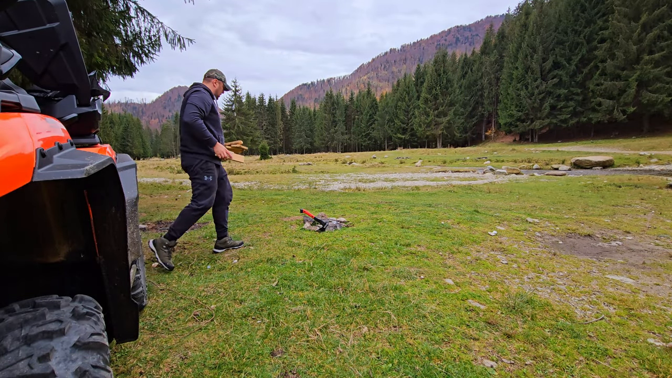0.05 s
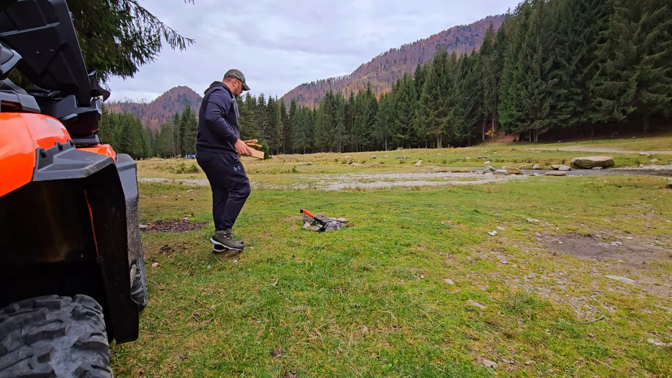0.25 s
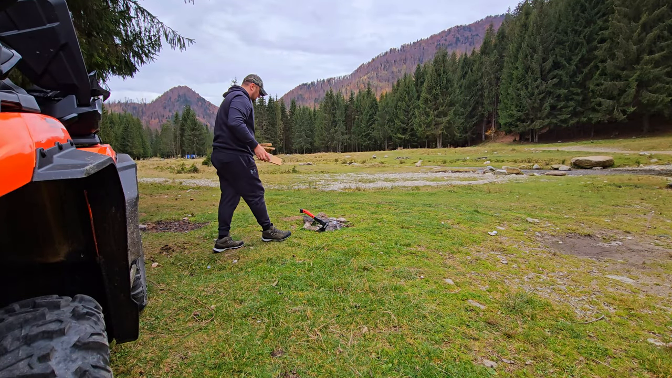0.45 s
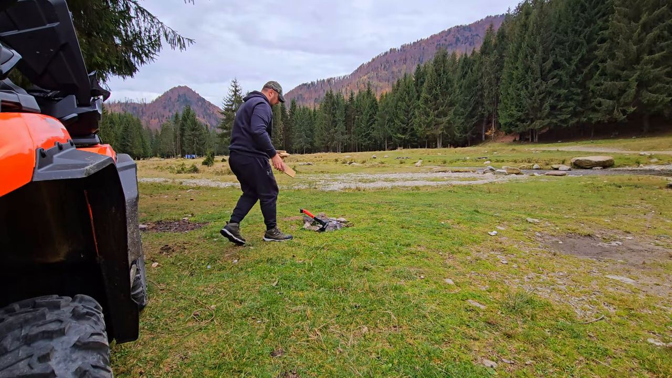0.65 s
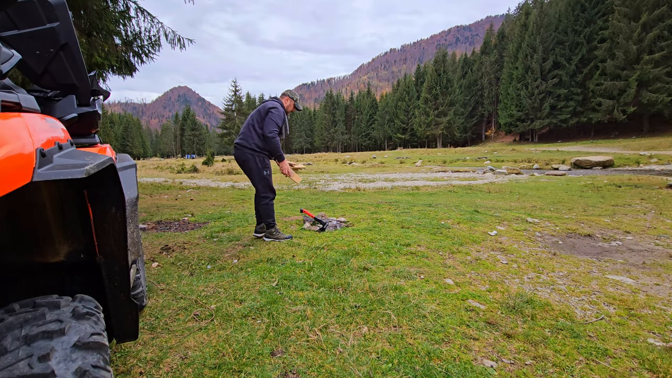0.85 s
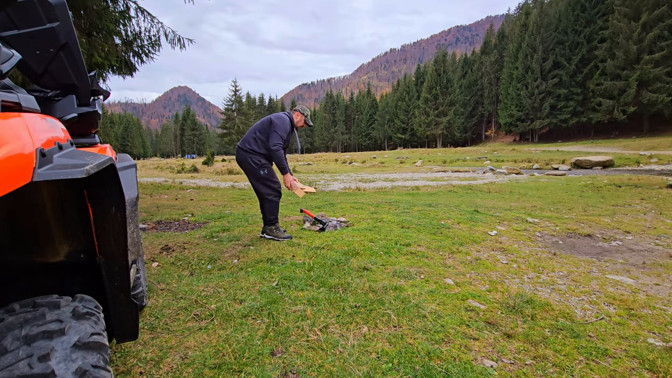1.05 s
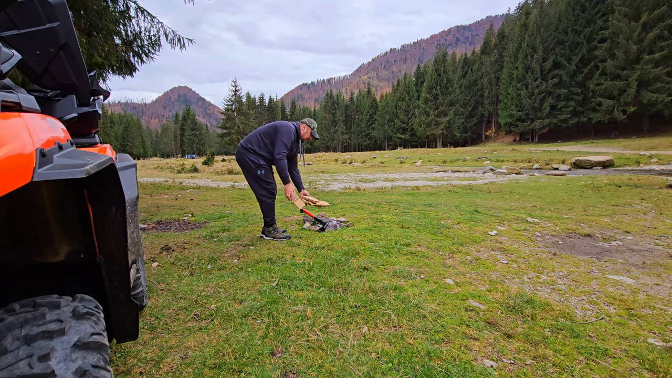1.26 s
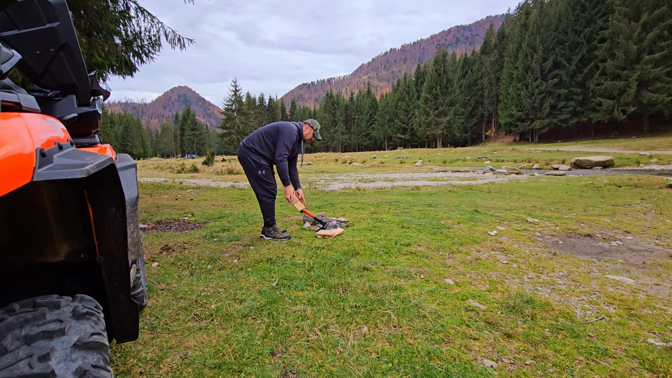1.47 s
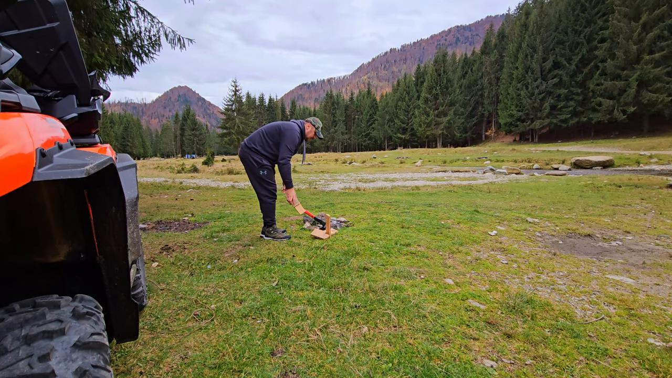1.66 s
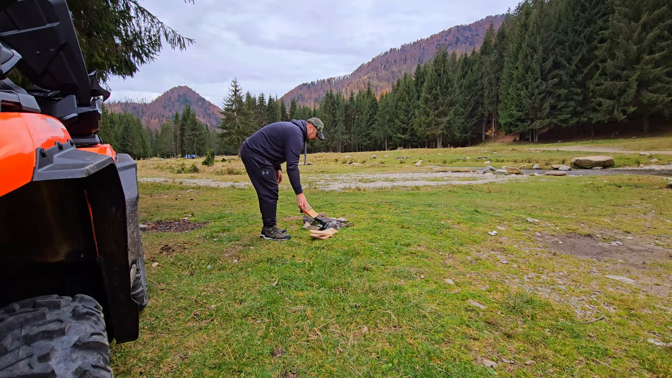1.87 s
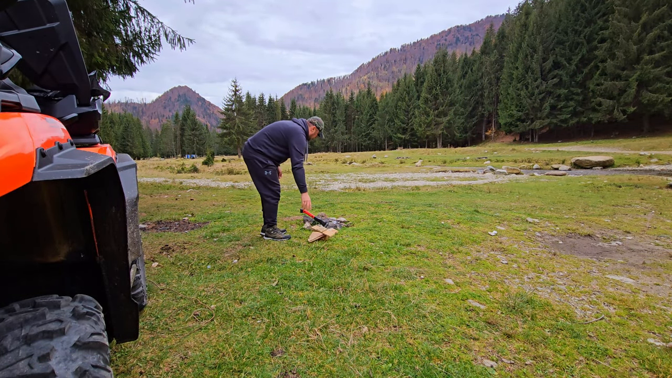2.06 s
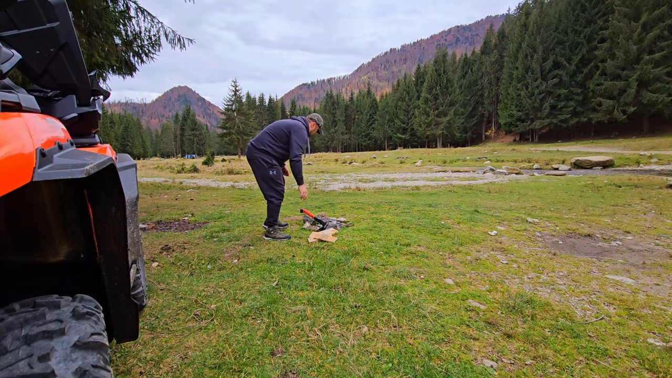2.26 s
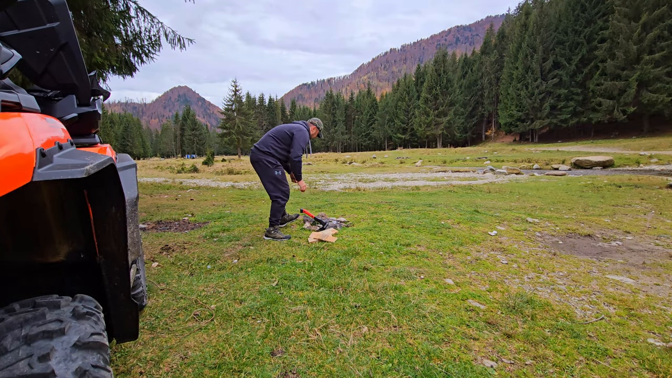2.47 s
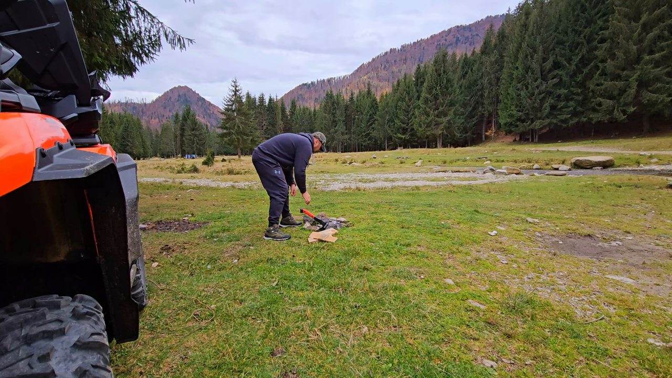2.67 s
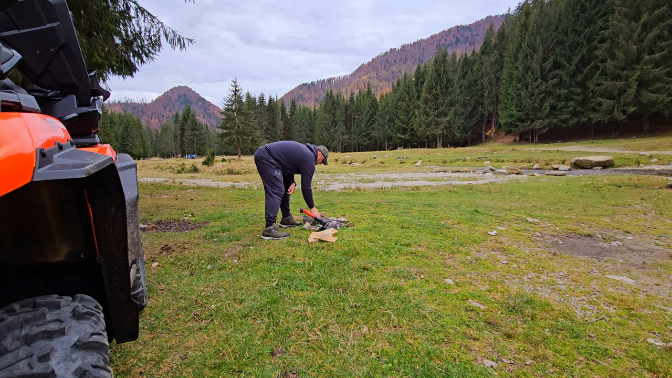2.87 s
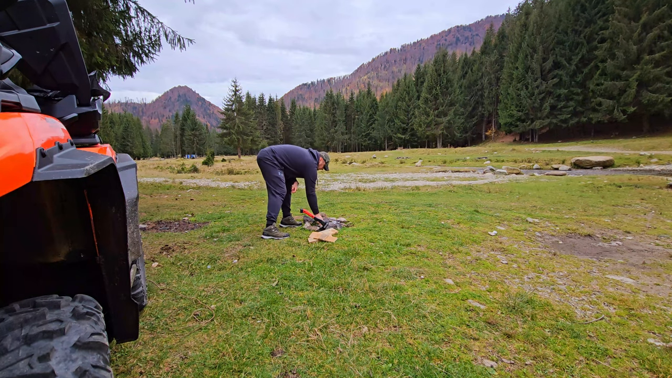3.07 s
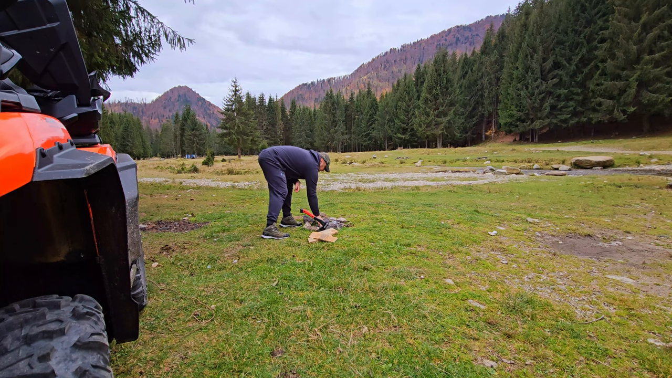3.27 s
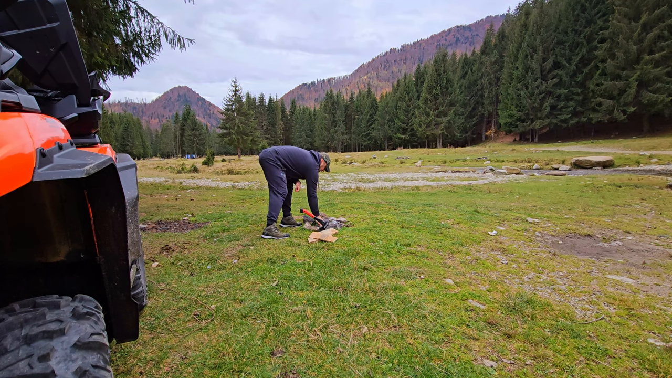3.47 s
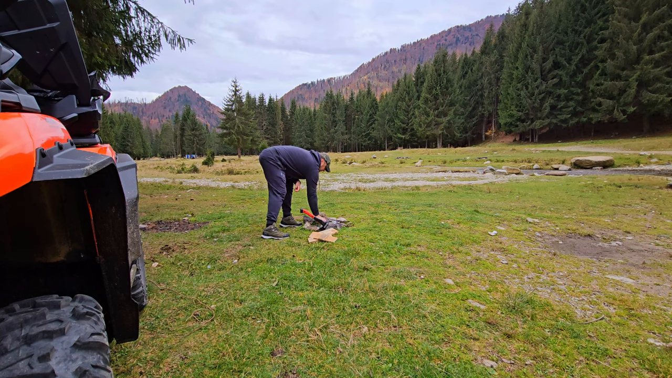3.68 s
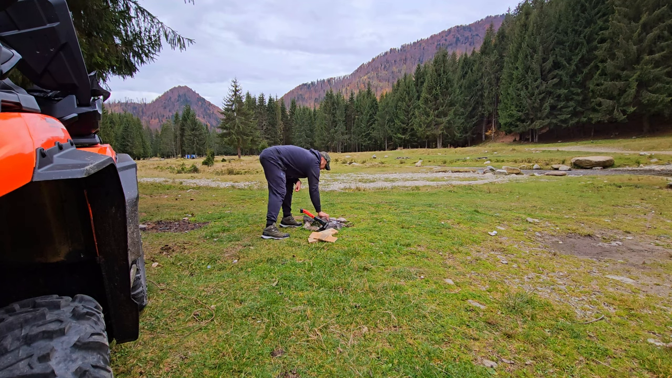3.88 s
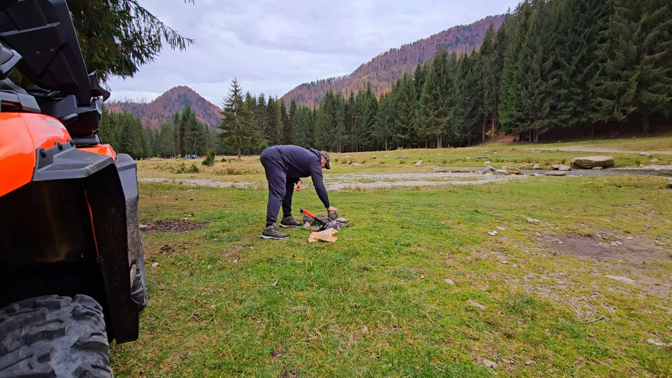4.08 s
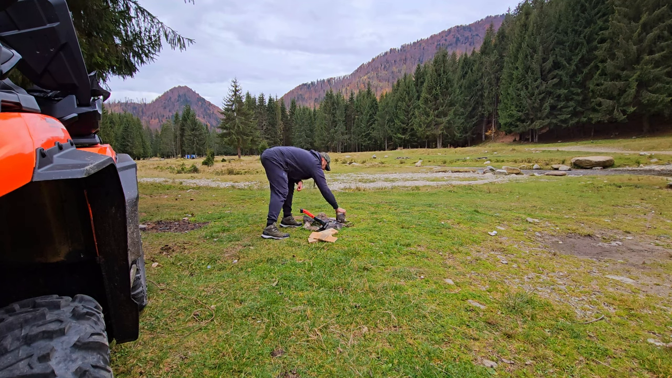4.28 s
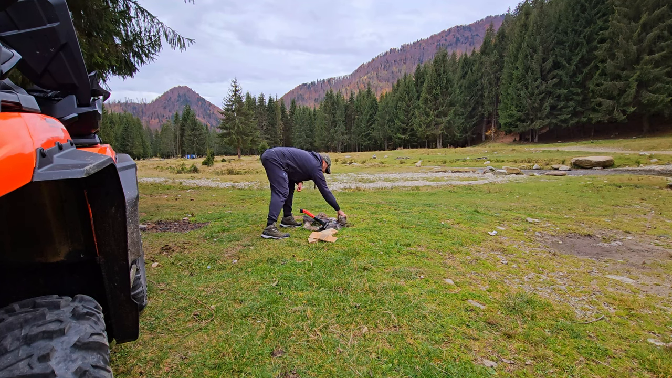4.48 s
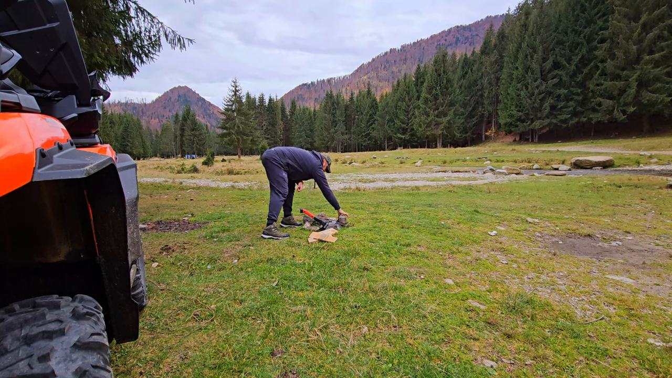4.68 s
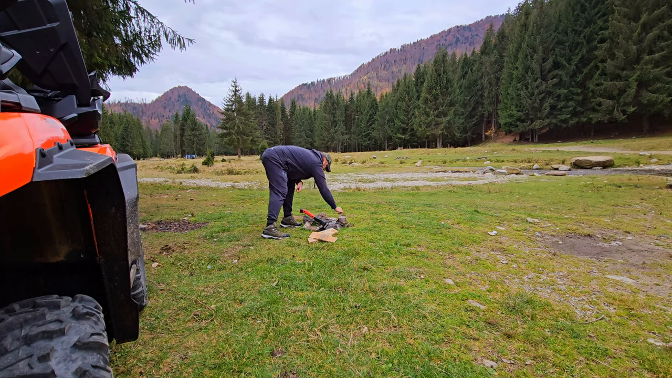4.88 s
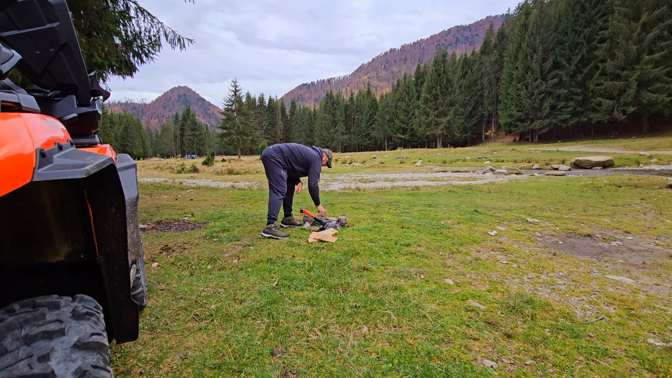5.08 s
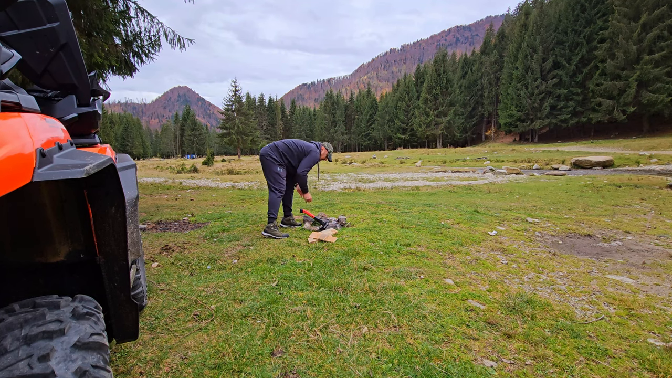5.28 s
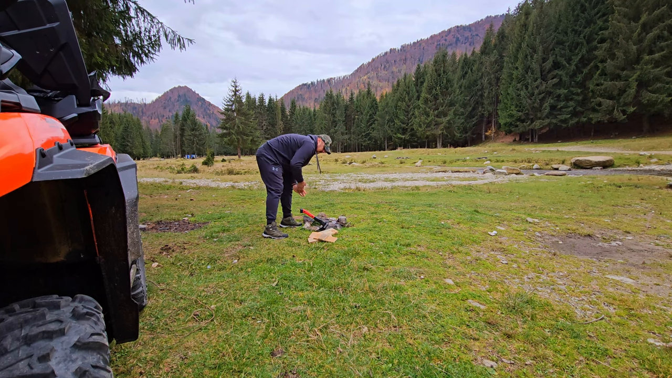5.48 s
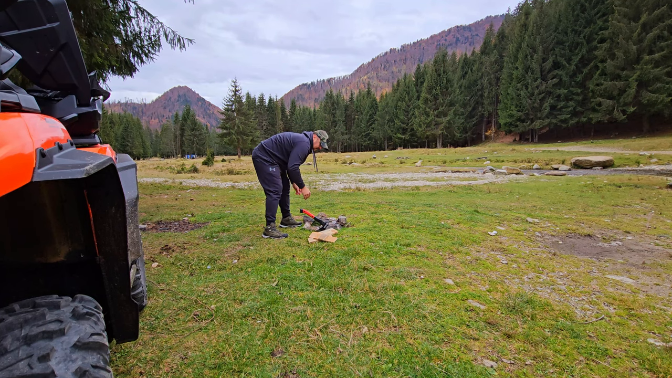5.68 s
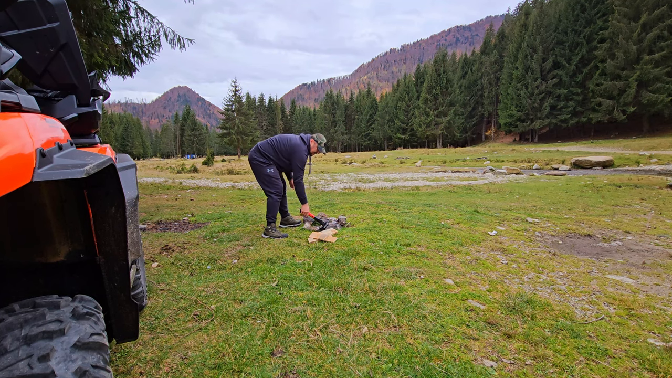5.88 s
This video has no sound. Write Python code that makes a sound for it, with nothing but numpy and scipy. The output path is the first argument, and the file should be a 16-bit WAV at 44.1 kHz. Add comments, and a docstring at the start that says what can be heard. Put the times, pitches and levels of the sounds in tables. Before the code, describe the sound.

Dry wooden clatter as two logs land one after another outdoors, followed by a dull set-down knock, with light mic wind and a faint bird.

```python
"""Two pieces of split firewood drop on a small pile in a meadow: each clatters and settles; between, a tap.
Each contact sums decaying log modes, noisy fibres, a pressure swing, a crack and a thud of the turf.
Later comes one dull knock as something is set down, the same way; short echoes and the forest edge answer.
Shaped noise makes the soft steps, bright ticks, scrapes, rustling, far river and light wind on the microphone.
A small bird calls faintly in thin trills: wavering, falling sines."""
import sys
import numpy as np
from scipy import signal
from scipy.fft import rfft, irfft, next_fast_len
from scipy.io import wavfile
from scipy.ndimage import uniform_filter1d, map_coordinates

SR = 44100
rng = np.random.default_rng(int(sys.argv[2]) if len(sys.argv) > 2 else 0)


def output_pcm(signal):
    """Save a mono or channel-first signal as 16-bit PCM at the path in sys.argv[1].

    Samples are clipped to [-1, 1] before scaling.
    """
    pcm = np.clip(np.atleast_2d(signal).T, -1, 1) * 32767
    wavfile.write(sys.argv[1], SR, np.round(pcm).astype(np.int16))


N = 261898

# spectrum of bright ticks and rustle: (frequency [Hz], density [dB per Hz])
BRIGHT_SPECTRUM = [(1500, -25), (5000, -13), (8000, -3.5), (10000, -10), (11500, -2.5), (13000, -9),
                   (16000, -10.5)]


def amp(db):
    """Decibels to gain."""
    return 10 ** (np.asarray(db) / 20)


def unit(x):
    """Scale to rms 1."""
    return x / np.sqrt(np.mean(x ** 2) + 1e-20)


def blow(x):
    """Scale a short sound to the energy of 10 ms at rms 1."""
    return x / np.sqrt(np.sum(x ** 2) / (SR / 100) + 1e-20)


def along(points, hz):
    """Interpolate (Hz, value) points on a log frequency axis."""
    point_hz, value = np.transpose(points)
    return np.interp(np.log(hz + 1), np.log(point_hz), value)


def filtered(x, response):
    """Multiply the spectrum of x by a response of frequency."""
    n = x.shape[-1]
    padded = next_fast_len(n + 8192)
    spectrum = rfft(x, padded) * response(np.fft.rfftfreq(padded, 1 / SR))
    return irfft(spectrum, padded)[..., :n]


def noise(spectrum, n):
    """Coloured noise of rms 1."""
    return unit(filtered(rng.standard_normal(n), lambda hz: amp(along(spectrum, hz))))


def fade(t, t60):
    """Exponential decay, 60 dB in t60 seconds."""
    return amp(-60 * t / t60)


def add(track, s, x):
    """Mix x into the track at time s."""
    part = track[round(s * SR):][:len(x)]
    part += x[:len(part)]


def rush(spectrum, patchy_db):
    """Stereo noise whose level drifts in time-frequency patches; the bass is most alike on both sides."""
    # left-right likeness: (frequency [Hz], correlation [-1 to 1])
    likeness = [(60, .92), (150, 0.85), (380, 0.52), (700, .25), (1200, -0.33), (2400, .1), (6000, -0.023)]
    bins = signal.stft(rng.standard_normal((2, N)), nperseg=512)[2]
    patches = rng.standard_normal(bins.shape[1:])
    patches = uniform_filter1d(patches, size=5, axis=0)
    patches = uniform_filter1d(patches, size=14, axis=1)
    pair = signal.istft(bins * amp(patchy_db * unit(patches)), nperseg=512)[1][:, :N]

    def mid_side_gain(hz):
        angle = np.arccos(np.clip(along(likeness, hz), -1, 1)) / 2
        return amp(along(spectrum, hz)) * [np.cos(angle), np.sin(angle)]

    mid, side = filtered(pair, mid_side_gain)
    return unit(np.array([mid + side, mid - side]))


def from_left(x, offset):
    """A source a little to the left: earlier there, and louder above the bass."""
    # level difference: (frequency [Hz], left minus right [dB])
    left_bias = [(100, -0.5), (400, 1), (800, 1.5), (2400, 3), (4200, 2.2), (8000, 2), (12000, 1.5)]
    # phase lead of the left side, scaled by offset: (frequency [Hz], lead at offset 1 [rad])
    left_lead = [(100, .05), (600, 0.35), (1400, 0.76), (2800, 0.54), (5000, 1.6), (8500, 2.11), (12000, 2)]
    side = np.array([[.5], [-.5]])

    def response(hz):
        gain = amp(side * along(left_bias, hz))
        return gain * np.exp(1j * side * offset * along(left_lead, hz))

    return filtered(x, response)


def river():
    """The murmur of distant water, a steady shaped noise."""
    # water spectrum: (frequency [Hz], density [dB per Hz])
    river_spectrum = [(29, -28), (50, -6), (83, -2), (119, -10), (193, -10.5), (312, -6), (1200, -15),
                      (1810, -14.5), (3000, -22.5), (4200, -23), (5220, -30.5), (8050, -34.5), (9300, -43),
                      (11300, -37), (15800, -40.5)]
    return amp(-63.5) * rush(river_spectrum, patchy_db=1.36)


def wobble(knots_per_s):
    """A smooth random curve through evenly spaced knots."""
    knots = rng.standard_normal(256)
    return map_coordinates(knots, [np.arange(N) * knots_per_s / SR], mode="wrap")


def wind():
    """Light, unsteady air buffets the microphone as low noise; now and then a puff swells and dies away."""
    # puffs above the breeze: (time [s], peak level [dB], swell time as Gaussian sigma [s])
    puffs = [(0.11, -48.5, 0.021), (0.26, -51, .025), (0.40, -52, 0.021), (0.59, -62, 0.037),
             (2.575, -57, 0.017), (3.415, -49, 0.031), (3.92, -56.5, 0.024)]
    # buffeting spectrum: (frequency [Hz], density [dB per Hz])
    buffet_spectrum = [(15, -2.5), (28, 2), (48, -0.5), (70, -6.5), (120, -24), (300, -47.5), (1000, -80)]
    breeze_db, swing_db, knots_per_s = -71.5, 3, 7.9
    fall_ratio = 1.33  # fall time over swell time
    t = np.arange(N) / SR
    strength = amp(breeze_db + swing_db * wobble(knots_per_s))
    for s, db, swell_s in puffs:
        width_s = np.where(t < s, swell_s, swell_s * fall_ratio)
        strength = strength + amp(db) * np.exp(-.5 * ((t - s) / width_s) ** 2)
    return strength * rush(buffet_spectrum, patchy_db=0.5)


def scrapes(grain_db=4):
    """Grainy friction of bark and grass as wood is handled and settles, swelling and dying away."""
    # strokes: (time [s], level [dB], t60 [s])
    strokes = [(.149, -54.5, .04), (1.601, -58.5, 1), (2.235, -59, .25), (2.926, -57, .062),
               (4.497, -50.5, 0.16), (4.58, -61, 0.52), (5.543, -56.5, 0.046)]
    # friction spectrum: (frequency [Hz], density [dB per Hz])
    scrape_spectrum = [(200, -13.5), (600, -0.5), (1100, -5.5), (1900, 0.5), (2700, -7), (3500, -11),
                       (5500, -16), (8000, -22), (15000, -36)]
    track, t = np.zeros(N), np.arange(SR // 2) / SR
    for s, db, t60 in strokes:
        roughness = unit(uniform_filter1d(rng.standard_normal(len(t)), size=120))
        friction = unit(amp(grain_db * roughness) * noise(scrape_spectrum, len(t)))
        envelope = fade(t, t60) * (1 - np.exp(-20 * t / t60))
        add(track, s, amp(db) * envelope * friction)
    return track


def bird(fall=.02, waver_hz=90, trill_hz=36, trill_db=4):
    """High, slightly falling trills: sines with wavering pitch and pulsing level."""
    # calls: (time [s], length [s], mid pitch [Hz], level before the trill [dB])
    calls = [(0.2, .12, 8540, -90), (0.937, 0.18, 7900, -80), (3.893, 0.066, 8650, -89),
             (4.027, 0.12, 8200, -86), (4.227, .12, 8050, -83)]
    track = np.zeros(N)
    for s, length_s, hz, db in calls:
        u = np.linspace(0, 1, int(length_s * SR))
        waver = unit(uniform_filter1d(rng.standard_normal(len(u)), size=90))
        pitch_hz = hz * (1 - fall * (u - .5)) + waver_hz * waver
        trill = amp(trill_db * (np.cos(2 * np.pi * trill_hz * length_s * u) - .5))
        tone = np.sin(2 * np.pi * np.cumsum(pitch_hz) / SR)
        add(track, s, amp(db) * trill * np.sin(np.pi * u) * tone)
    return track


def rustle():
    """Sleeves and grass brush as the body moves: a bright hiss rises, holds and fades."""
    # brushes: (start [s], length [s], level [dB])
    brushes = [(0.47, 0.55, -82.5), (5.535, 0.09, -79), (5.594, 0.13, -73)]
    attack, release = 0.15, 0.43  # shares of a stroke's length
    t, strength = np.arange(N) / SR, np.zeros(N)
    for s, length_s, db in brushes:
        u = (t - s) / length_s
        strength += amp(db) * np.clip(np.minimum(u / attack, (1 - u) / release), 0, 1)
    return strength * rush(BRIGHT_SPECTRUM, patchy_db=1.0)


def steps():
    """Weight shifts on the turf: dull noise swells and fades softly."""
    # shifts: (time [s], level [dB], Gaussian sigma [s])
    shifts = [(.65, -65, 0.022), (0.967, -65, 0.013), (1.078, -63.5, 0.0082), (1.771, -57, 0.036),
              (2.777, -59.5, 0.0089), (2.81, -63, 0.0043), (2.895, -64, 0.047), (4.371, -66, 0.012),
              (4.52, -61, 0.013), (4.936, -62, 0.018)]
    # turf spectrum: (frequency [Hz], density [dB per Hz])
    turf_spectrum = [(100, -23.5), (210, -0.5), (290, 2.5), (400, -2), (600, -6.5), (1500, -18.5),
                     (5000, -36), (15000, -38)]
    strength, t = np.zeros(N), np.arange(N) / SR
    for s, db, sigma_s in shifts:
        strength += amp(db) * np.exp(-.5 * ((t - s) / sigma_s) ** 2)
    return strength * noise(turf_spectrum, N)


def firewood(contacts, modes, ring, vary_db, focus_db, push_db, fibre_db, fibre_t60, crack_t60, thud_t60,
             crack_db, crack_db_per_octave, thud_db, thud_growth, low_cut_hz=75):
    """Each contact pushes the air, cracks, rings the log's modes and thumps the ground."""
    # noisy parts of a blow, each: (frequency [Hz], density [dB per Hz])
    crack_spectrum = [(200, -24), (500, -2.5), (1200, -2), (2700, -2), (4500, -7.5), (5400, -11.5),
                      (8000, -6.5), (10000, -13), (11500, -11.5), (16000, -12.5)]
    fibre_spectrum = [(250, -33), (500, -4.5), (1000, -6), (2700, 0.5), (3300, -11), (4400, -3),
                      (5300, -20.5), (8000, -21.5), (15000, -32)]
    thud_spectrum = [(30, -33), (70, -18), (105, 8), (160, -13.5), (230, 1), (300, -25.5), (500, -10.5),
                     (1200, -38.5), (4000, -71)]
    medium_hz, medium_db = 2600, -35  # middling contact, the reference for crack and thud
    track, t = np.zeros(N), np.arange(SR // 4) / SR
    hz, mode_db, t60 = np.transpose(modes)[:, :, None]
    signs = (-1) ** np.arange(len(modes))[:, None]
    shapes = signs * np.sin(2 * np.pi * hz * t)
    for s, db, bright_hz, favoured_hz, free in contacts:
        # every blow shares its energy anew among the modes; a pinned log rings shorter than a free one
        strength = amp(mode_db + vary_db * rng.standard_normal(hz.shape))
        tone = blow(np.sum(shapes * strength * fade(t, t60 * ring * free), axis=0))
        # the sudden stop sends out one short swing of pressure
        u = 2 * np.pi * favoured_hz * t - np.pi
        push = amp(push_db) * blow(u * np.exp(-.5 * u ** 2))
        # the ragged shape and the pile beneath add many weak, crowded modes, heard as noise
        fibres = amp(fibre_db) * blow(noise(fibre_spectrum, len(t)) * fade(t, fibre_t60 * free))
        # the share of crack depends on the contact's brightness
        crack_gain = amp(crack_db + crack_db_per_octave * np.log2(bright_hz / medium_hz))
        crack = crack_gain * blow(noise(crack_spectrum, len(t)) * fade(t, crack_t60))
        # the point of contact favours one part of the body's range
        body = tone + fibres
        focus = signal.lfilter(*signal.iirpeak(favoured_hz, 2.4, fs=SR), body)
        body = blow(body + amp(focus_db) * focus)
        # a softer contact leaves out the treble
        soft = signal.butter(2, bright_hz, fs=SR)
        knock = blow(signal.lfilter(*soft, body + push + crack))
        # the thud of the turf grows with the force of the blow
        thud = blow(noise(thud_spectrum, len(t)) * fade(t, thud_t60) * (1 - np.exp(-t / .002)))
        thud_gain = amp(thud_db + thud_growth * (db - medium_db))
        add(track, s, amp(db) * knock + thud_gain * thud)
    # a high-pass takes away the deep bass
    return signal.lfilter(*signal.butter(2, low_cut_hz, "high", fs=SR), track)


def first_piece():
    """The first log strikes the pile, rocks and settles; later the second taps it, ringing the same modes."""
    # contacts, the last two the tap:
    # (time [s], level [dB], low-pass cutoff [Hz], favoured frequency [Hz], ring length factor)
    contacts = [(1.571, -29, 3498, 1190, 0.73), (1.5738, -23.5, 5090, 4115, 0.49),
                (1.5765, -28.5, 4780, 2400, 1.4), (1.5825, -24.5, 2600, 1100, .62),
                (1.5905, -27, 2595, 854, 1.13), (1.685, -51.5, 1795, 690, 0.86),
                (1.751, -36.5, 2400, 1394, 0.47), (1.755, -44.5, 1402, 980, 0.78),
                (1.7611, -42.5, 1500, 1020, 0.25), (1.812, -58, 3000, 500, .6),
                (1.8236, -35, 2700, 2363, 0.48), (1.827, -42.5, 1908, 1063, 1.6),
                (2.0197, -37.5, 5500, 1250, 0.45), (2.0255, -45.5, 2588, 752, 0.87)]
    # log modes: (frequency [Hz], relative level [dB], t60 before the ring factors [s])
    modes = [(227.9, -17.5, .1), (348, -12.5, .06), (496, -7.5, 0.1), (673, -9, 0.063), (806, -4.5, .06),
             (890, -5, 0.032), (994, -1, 0.084), (1120, -14, 0.042), (1195, -7, 0.068), (1353, -10.5, 0.13),
             (1440, -9.5, 0.11), (1605, -3, .08), (2092, 3, 0.052), (2230, -4, 0.094), (2354, 0.5, 0.053),
             (2527, -2.5, .055), (2820, -4, .07), (2905, -5, .07), (3570, -11, 0.046), (4000, -9.5, 0.061),
             (4198, -10.5, 0.041), (4400, -11.5, .035)]
    return firewood(contacts, modes, ring=0.92, vary_db=5.0, focus_db=4.5, push_db=-13,
                    fibre_db=-4.5, fibre_t60=0.069, crack_t60=0.02, thud_t60=0.13,
                    crack_db=-7.5, crack_db_per_octave=5.5, thud_db=-52, thud_growth=1.15)


def nearby(x):
    """Quick reflections off the turf and a parked vehicle: decaying noise, different on each side."""
    t = np.arange(SR // 16) / SR
    scatter = rng.standard_normal((2, len(t))) * fade(t, .035)
    return signal.fftconvolve(x[None], scatter / np.linalg.norm(scatter[0]), axes=1)[:, :N]


def forest(x, dull_hz=5000):
    """Thin scatter from ground and trees, dulled by distance; its decay time varies with frequency."""
    # scatter decay: (frequency [Hz], t60 [s])
    forest_t60 = [(150, .35), (700, 0.29), (2500, 0.46), (5000, 0.43), (12000, 1)]
    hz, t, bins = signal.stft(rng.standard_normal((2, SR * 3 // 4)), SR, nperseg=256)
    decay = fade(t, along(forest_t60, hz)[:, None])
    onset = 1 - np.exp(-t / 0.01)
    dulling = np.hypot(1, hz / dull_hz)[:, None]
    tail = signal.istft(bins * decay * onset / dulling, SR, nperseg=256)[1]
    return signal.fftconvolve(x[None], tail / np.linalg.norm(tail[0]), axes=1)[:, :N]


def bright_ticks():
    """Small bright ticks of decaying noise."""
    # ticks: (time [s], level [dB], t60 [s])
    ticks = [(2.021, -51, .022), (2.8428, -52.5, 0.015), (4.398, -66, 0.03), (4.479, -57, 0.052),
             (4.4872, -48, .028), (4.494, -62, 0.18)]
    track, t = np.zeros(N), np.arange(SR // 4) / SR
    for s, db, t60 in ticks:
        add(track, s, amp(db) * noise(BRIGHT_SPECTRUM, len(t)) * fade(t, t60))
    return track


def second_piece():
    """The second log lands and settles, with its own modes and a shorter ring factor."""
    # contacts: (time [s], level [dB], low-pass cutoff [Hz], favoured frequency [Hz], ring length factor)
    contacts = [(2.190, -51, 5000, 2000, 1.2), (2.205, -33.5, 2300, 900, 0.53),
                (2.2171, -20, 7000, 1120, .89), (2.2225, -30.5, 8400, 3700, 1),
                (2.2255, -22, 6500, 2400, .9), (2.322, -45, 1290, 1240, 1.9),
                (2.358, -47.5, 1200, 646, 3.3)]
    # log modes: (frequency [Hz], relative level [dB], t60 before the ring factors [s])
    modes = [(385.7, -10.5, 0.044), (514.4, -14, 0.31), (646, -25.5, 0.15), (737, -10, 0.072),
             (861, -8, 0.01), (1005, -16.5, 0.027), (1200, 0.5, 0.052), (1341, -9.5, 0.044),
             (1836, -30, 0.021), (2170, -7, 0.063), (2200, -8.5, .05), (2530, 2, 0.017), (2585, -14, 0.013),
             (2900, -0.5, 0.013), (2900, -2.5, 0.062), (2954, -2.5, .045), (3570, 7, 0.016),
             (3960, 1.5, 0.05), (4150, -2, 0.057), (4600, -1, .03), (5556, -12, .04), (6420, -6, 0.039)]
    return firewood(contacts, modes, ring=0.73, vary_db=0.5, focus_db=-1.5, push_db=-7.5,
                    fibre_db=-1.5, fibre_t60=0.051, crack_t60=0.033, thud_t60=0.076,
                    crack_db=-1.5, crack_db_per_octave=-0.7, thud_db=-58.5, thud_growth=0.6, low_cut_hz=110)


def set_down():
    """Something is set down: two close contacts ring dull modes as one knock."""
    # contacts: (time [s], level [dB], low-pass cutoff [Hz], favoured frequency [Hz], ring length factor)
    contacts = [(4.4872, -34.5, 3300, 1310, 0.95), (4.4905, -38.5, 1490, 570, 0.95)]
    # dull modes: (frequency [Hz], relative level [dB], t60 before the ring factors [s])
    modes = [(124, -9, 0.079), (261, -16.5, 0.29), (390, -38, 0.018), (600, 7, 0.013), (710, 0, 0.065),
             (1287, 10.5, 0.02), (1590, -5, 0.061), (2040, -8, 0.0044)]
    return firewood(contacts, modes, ring=.9, vary_db=2.0, focus_db=-18, push_db=-9.5,
                    fibre_db=-5.5, fibre_t60=0.027, crack_t60=0.0062, thud_t60=0.18,
                    crack_db=-2.5, crack_db_per_octave=3.0, thud_db=-45.5, thud_growth=1.4, low_cut_hz=45)


def scene():
    """The wood pile in front of river, wind and bird."""
    drops = first_piece() + second_piece()
    last = set_down()
    near = from_left(drops + steps() + scrapes(), offset=1.074)
    near = near + from_left(last + bright_ticks(), offset=0.66)
    echoes = amp(-18.5) * nearby(drops + last) + amp(-27) * forest(drops + last)
    return near + echoes + rustle() + river() + wind() + bird()


def record(dry):
    """Band limit: a 400 Hz wide linear slope around 15.9 kHz removes all above."""
    top_hz = 15900
    return filtered(dry, lambda hz: np.clip((top_hz - hz) / 400 + .5, 0, 1))


dry = scene()
out = record(dry)
output_pcm(out)
```